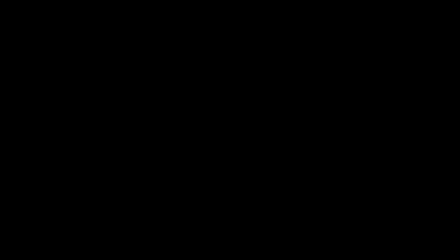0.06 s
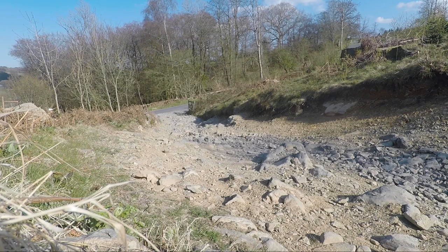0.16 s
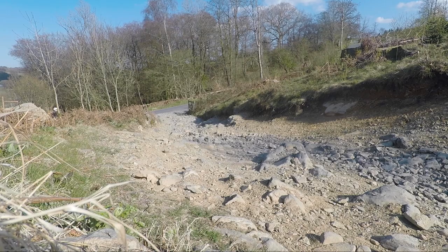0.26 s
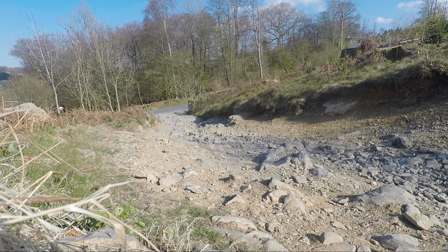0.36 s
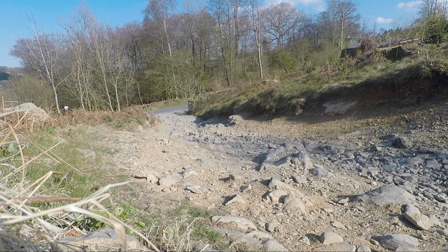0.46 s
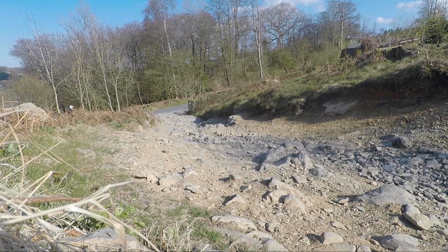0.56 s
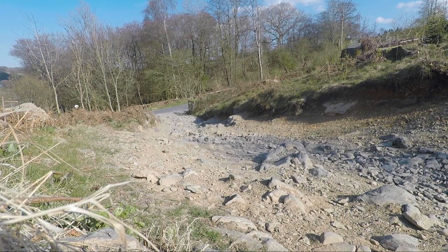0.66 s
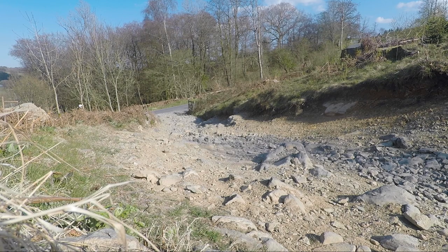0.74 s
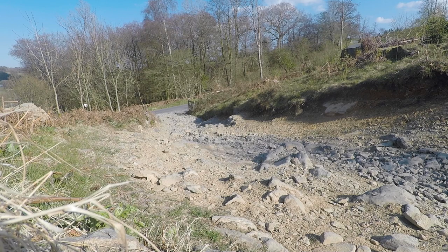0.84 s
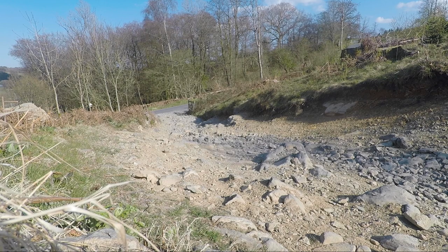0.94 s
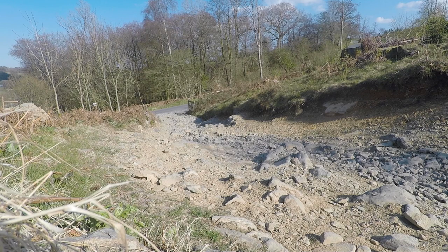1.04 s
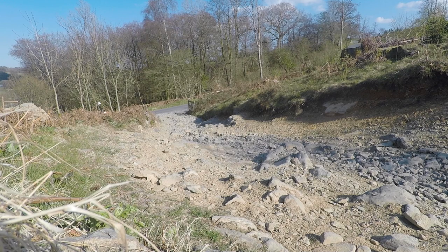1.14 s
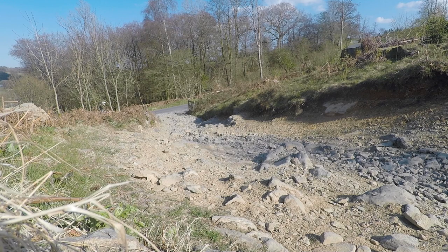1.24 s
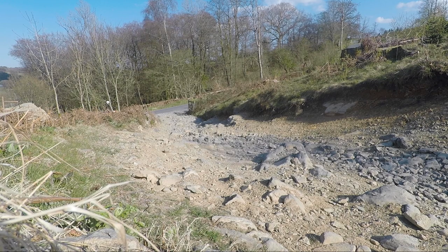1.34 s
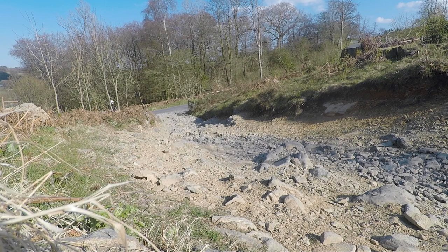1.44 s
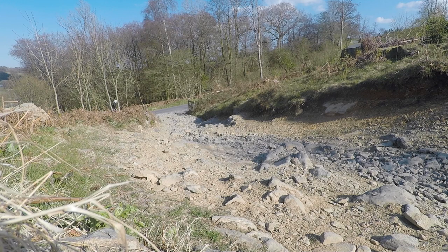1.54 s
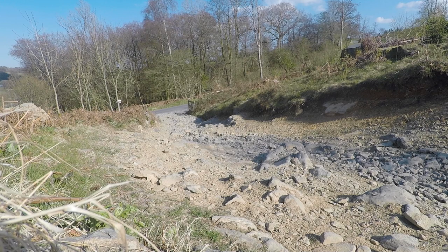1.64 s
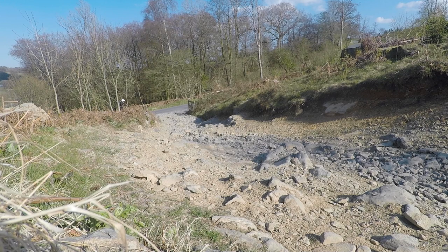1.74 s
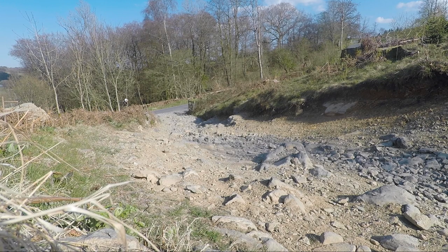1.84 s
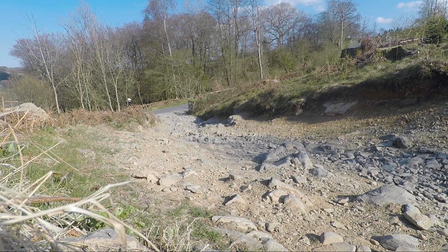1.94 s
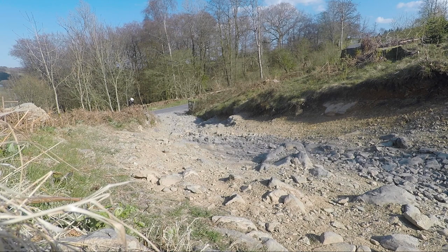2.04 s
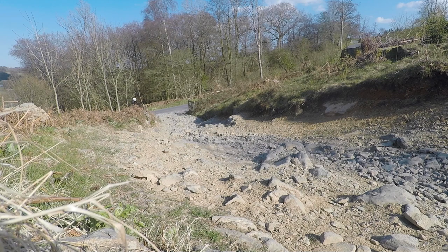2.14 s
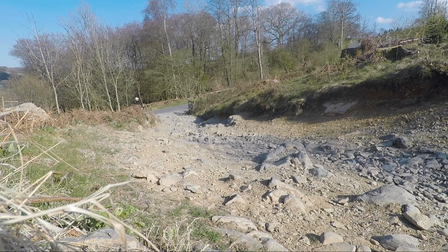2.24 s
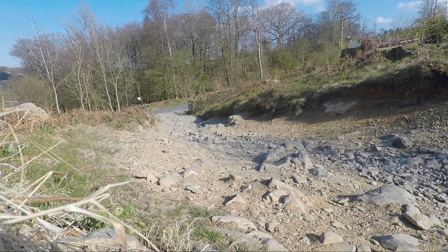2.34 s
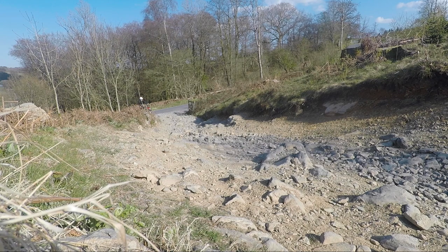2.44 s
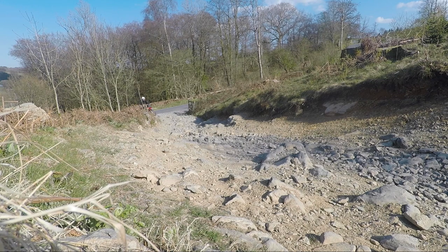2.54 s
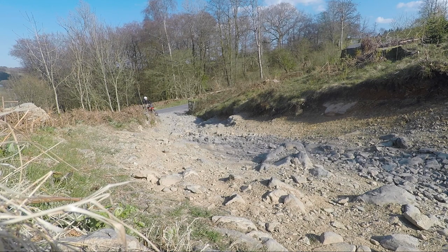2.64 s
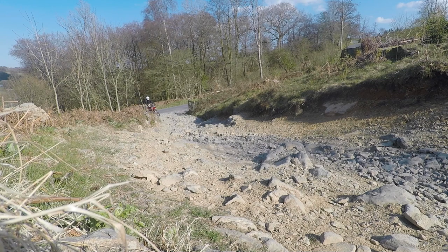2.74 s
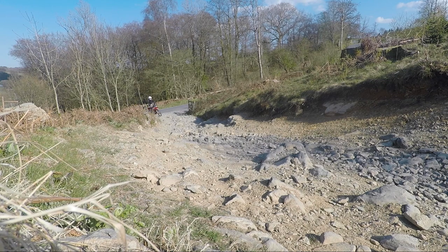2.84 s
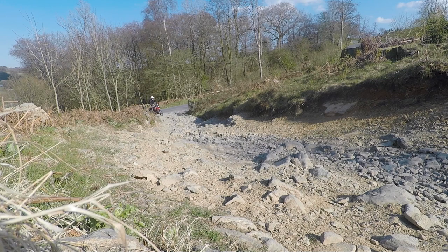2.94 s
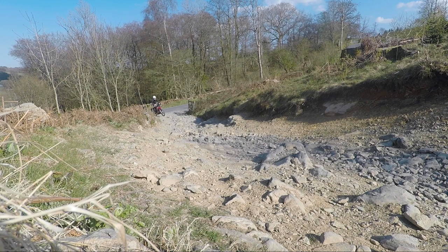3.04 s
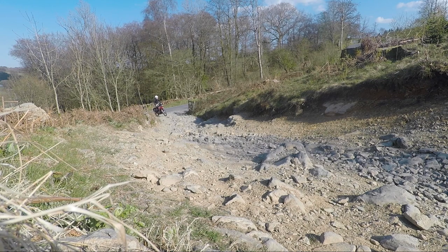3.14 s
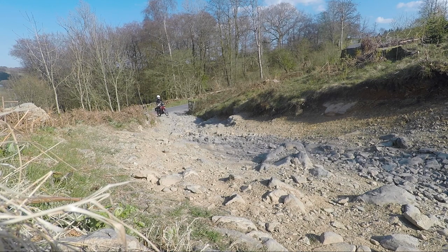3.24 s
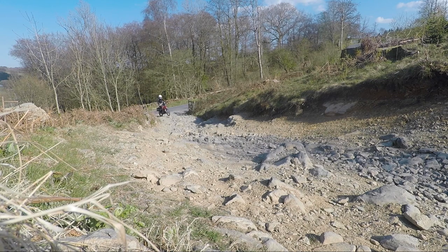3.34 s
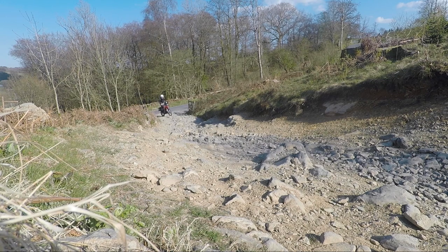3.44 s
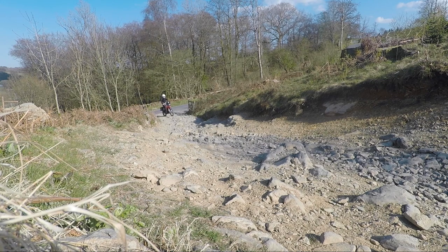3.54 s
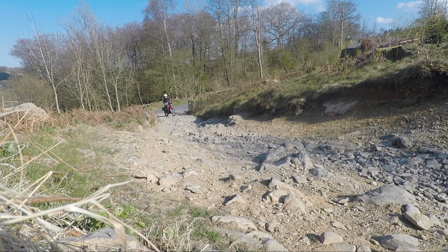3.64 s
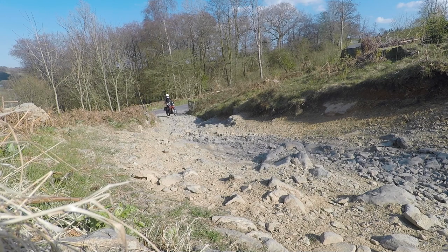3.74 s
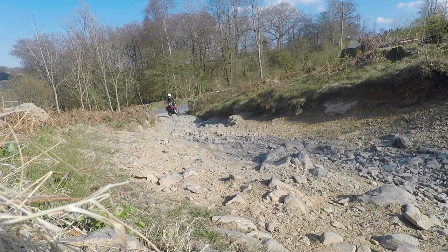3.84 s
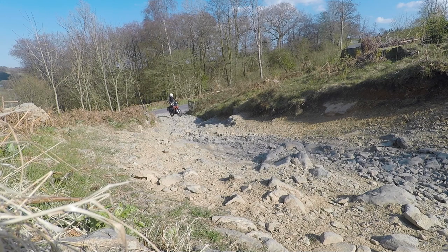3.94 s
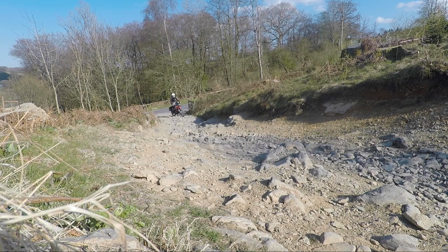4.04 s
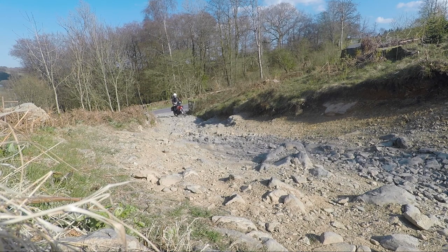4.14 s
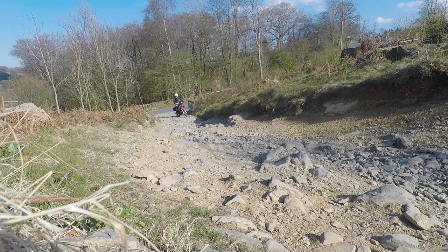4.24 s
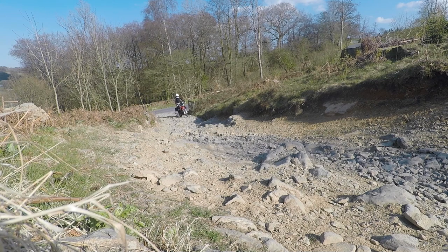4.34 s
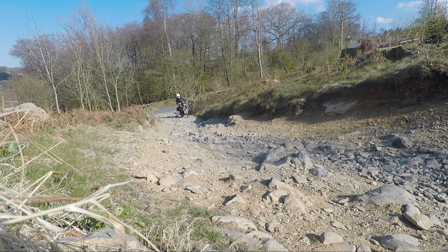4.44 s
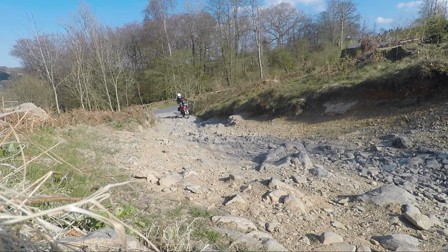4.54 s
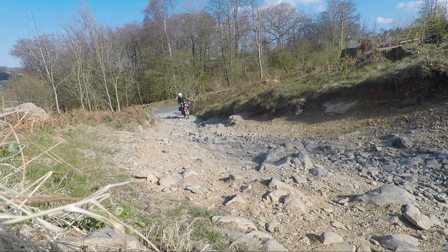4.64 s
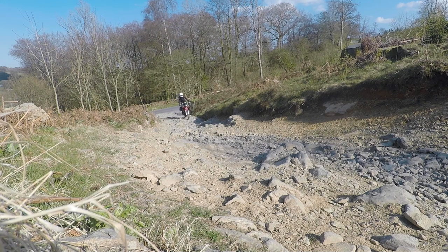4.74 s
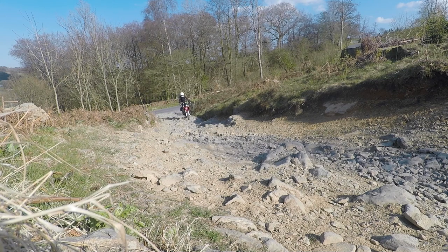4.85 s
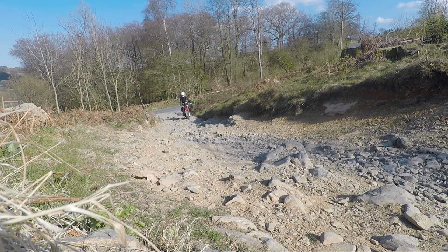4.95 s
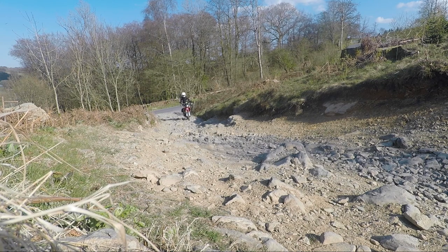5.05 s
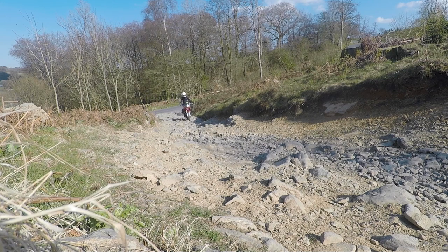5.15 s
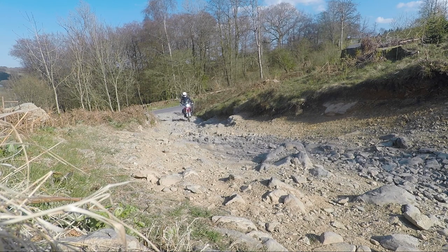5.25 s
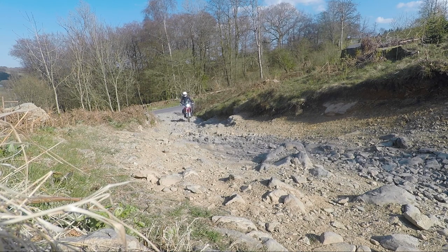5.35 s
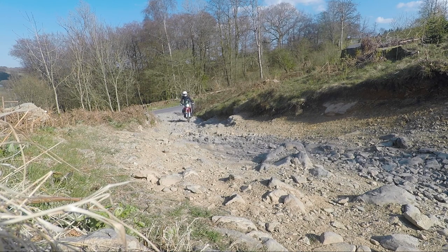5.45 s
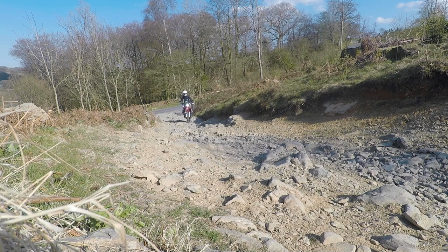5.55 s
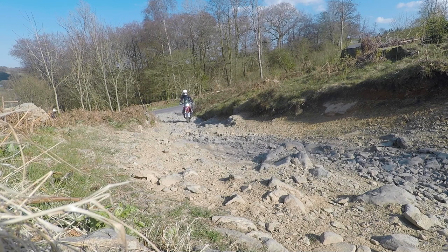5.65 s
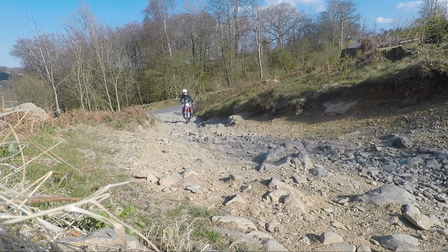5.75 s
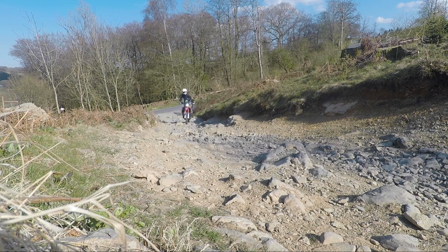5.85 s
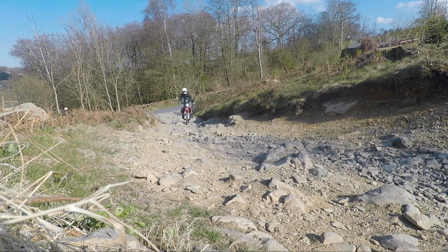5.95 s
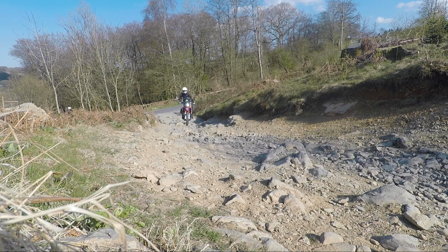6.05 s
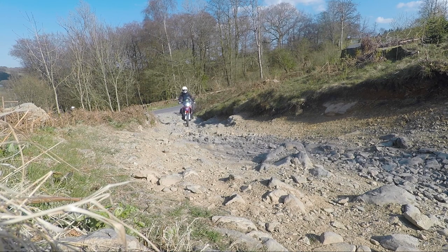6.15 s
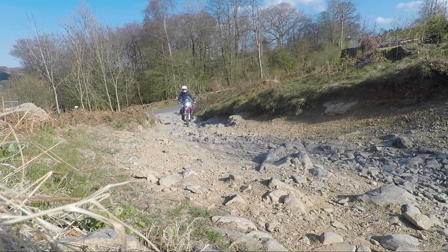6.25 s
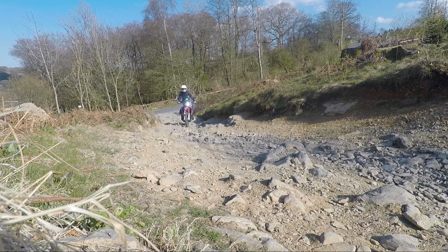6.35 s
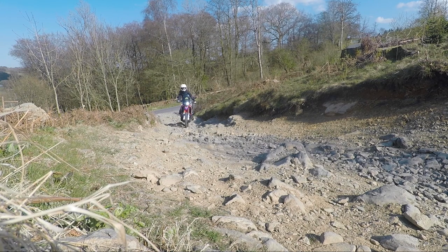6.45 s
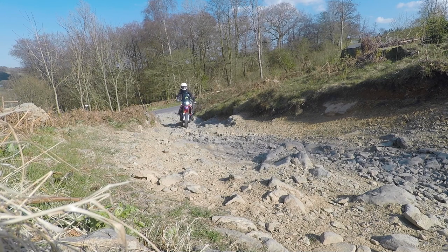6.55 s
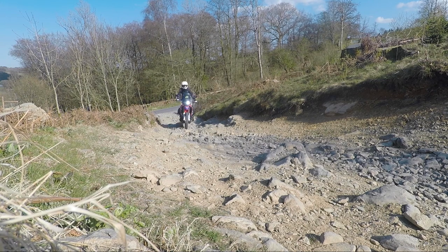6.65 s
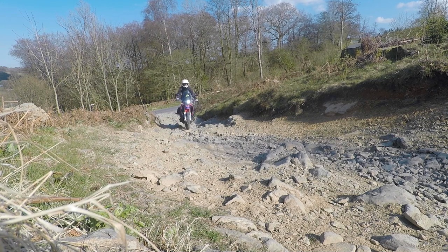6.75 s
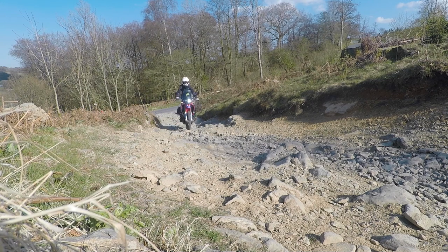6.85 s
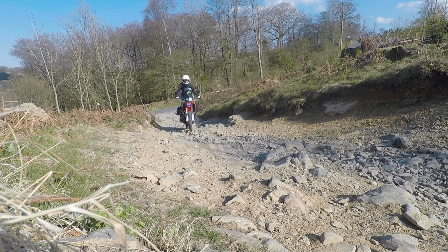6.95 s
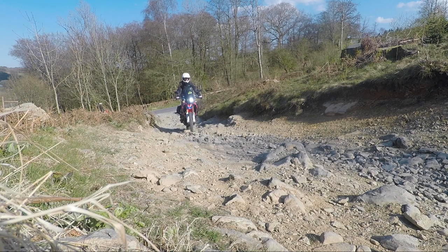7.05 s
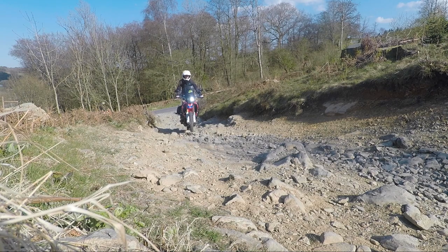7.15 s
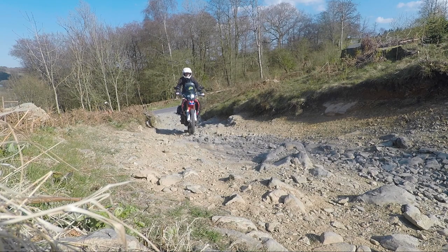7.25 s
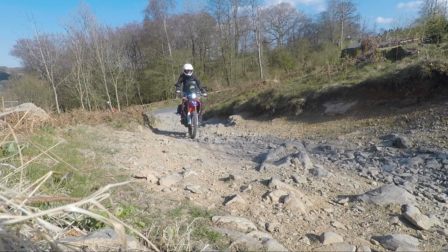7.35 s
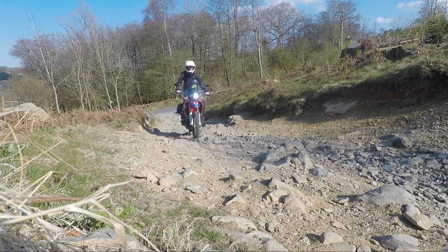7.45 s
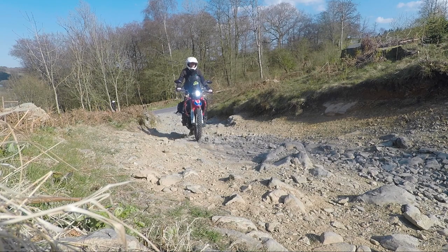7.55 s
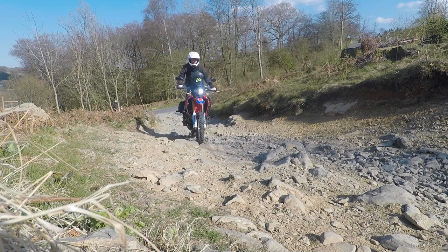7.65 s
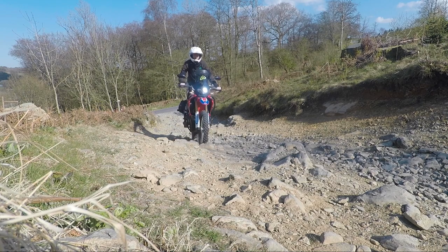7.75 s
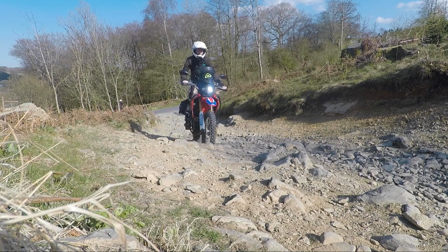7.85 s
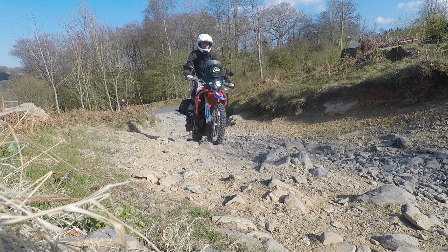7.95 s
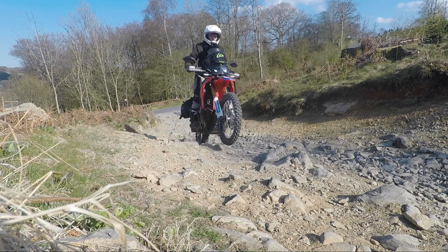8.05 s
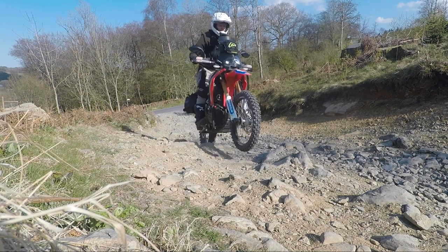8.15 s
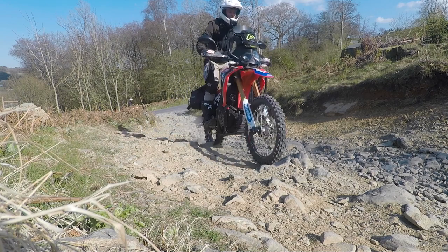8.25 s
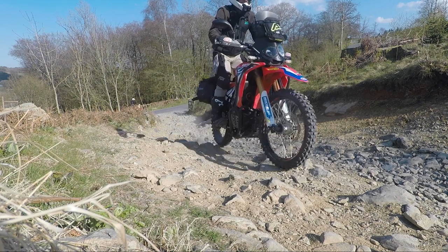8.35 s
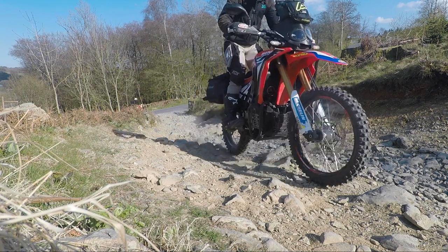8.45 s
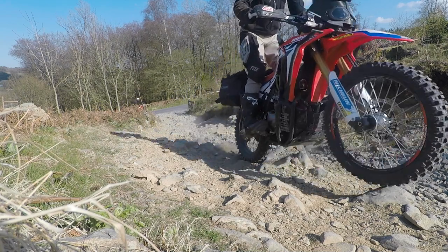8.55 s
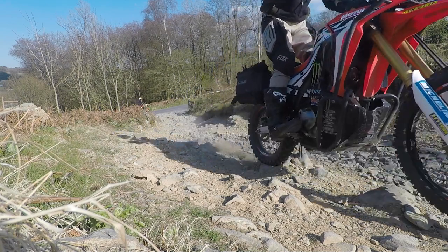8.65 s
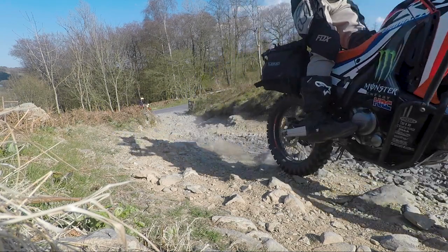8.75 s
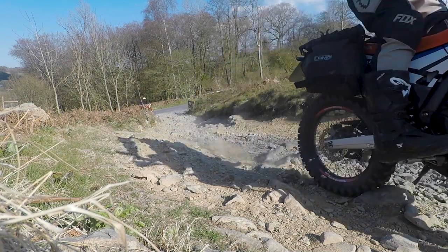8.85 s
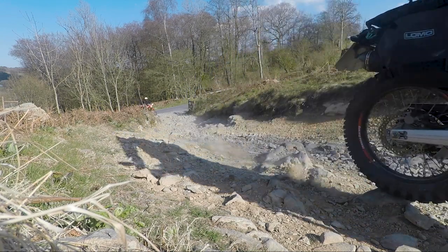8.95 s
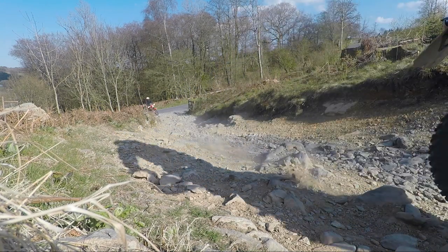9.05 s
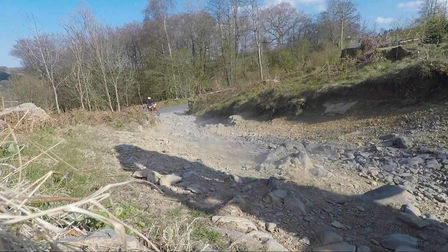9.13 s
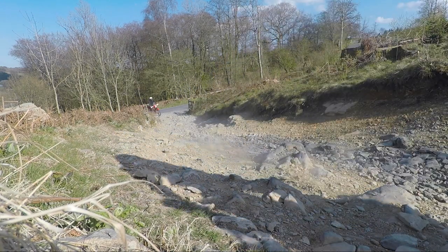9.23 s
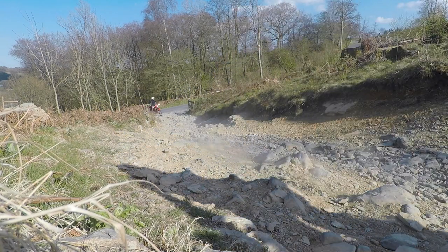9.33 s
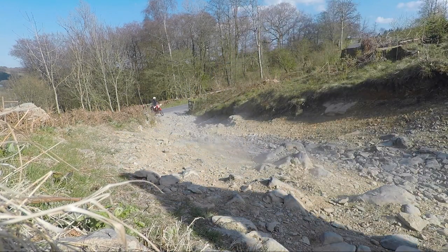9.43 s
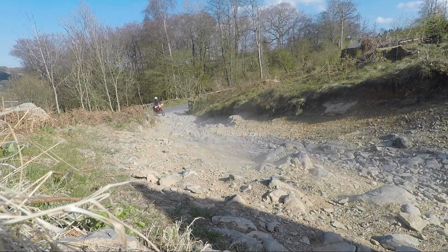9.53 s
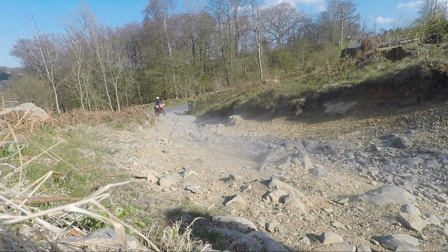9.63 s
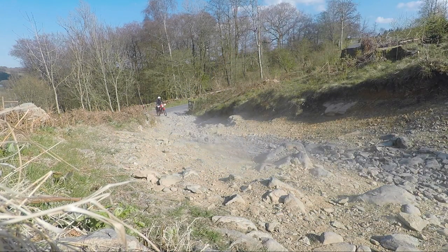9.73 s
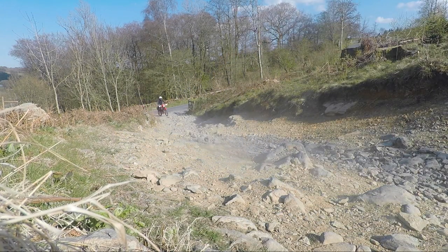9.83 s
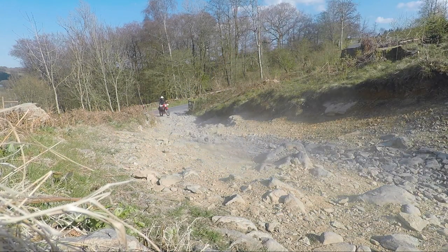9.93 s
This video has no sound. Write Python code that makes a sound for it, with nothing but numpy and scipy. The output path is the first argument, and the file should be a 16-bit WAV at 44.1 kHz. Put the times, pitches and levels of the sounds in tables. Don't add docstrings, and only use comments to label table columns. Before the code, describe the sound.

Silence for 0.2 s, then abrupt open-air hiss on a wooded hillside. Until about 3 s, faint chirps, buzzy notes and a quick trill of falling whistles sit over a dull distant trail bike, which revs up towards 4 s, then drops in pitch with a gear change and a heavier drone. From about 3 s a nearer single-cylinder bike fades in, firing roughly twenty times a second, with little stone ticks and one soft wind bump at 4 s. It grows steadily from 5 to 7 s, low thump and bark joined by valve rattle and scraping scree. From 7.3 s gravel crunches, stones crack and gear whine rises; engine speed lurches over rocks. It passes close on the right around 9 s, loudest, then the exhaust turns raspy and gassy from behind, easing by 10 s over the other engine's low drone.

```python
import sys
import numpy as np
from scipy import signal
from scipy.fft import rfft, irfft, next_fast_len
from scipy.io import wavfile
from scipy.ndimage import uniform_filter1d

SR = 44100
rng = np.random.default_rng(int(sys.argv[2]) if len(sys.argv) > 2 else 0)


def wrap_up_sound(samples):
    columns = np.atleast_2d(samples).T
    tamed = np.clip(columns, -1, 1)
    steps = np.round(tamed * 32767).astype(np.int16)
    wavfile.write(sys.argv[1], SR, steps)


def field_ratio(decibels):
    return 10 ** (np.asarray(decibels, dtype=float) / 20)


N = 440559
TIME = np.arange(N) / SR

# freq_hz, density_db
HILL_HISS = [(190, 6), (330, 2.5), (768, -6), (2470, -14.5), (2910, -14.5), (3650, -15), (4730, -19),
             (7460, -20), (10500, -25), (15000, -37), (16000, -72)]
# freq_hz, density_db
WIND_RUMBLE = [(14, -6), (30, -4), (55, -17)]
# centre_s, level_db, length_s
GUSTS = [
    (.77, -87, .06),
    (3.978, -30, .07),
]

# time_s, firing_rate_hz
FAR_RATE = [(0.2, 34.46), (0.72, 26.04), (0.9, 25.0), (1.68, 28.05), (1.98, 30.21), (2.16, 29.96),
            (2.79, 32.88), (3.6, 38.55), (4.14, 40.91), (4.32, 39.52), (4.59, 32.77), (4.8, 24.37),
            (5.0, 23.21), (6.0, 24.5), (7.4, 27), (8.6, 24), (10, 26.5)]
# time_s, level_db, load_0_1
FAR_LEVEL = [(.2, -35, 0.16), (.8, -32.5, 0.27), (1.55, -35.5, 0.59), (2.2, -32.5, 0.23), (2.6, -31.5, 0),
             (3.0, -30, 0), (3.4, -30.5, 0.34), (3.8, -29, 0.3), (4.32, -31, 0.73), (4.45, -27.5, 1),
             (4.75, -27.5, 1.07), (4.9, -28, 0.98), (5.5, -25.5, 0.46), (6.5, -22.5, 0.93),
             (7.5, -19.5, 0.61), (8.5, -19.5, 0.58), (9.0, -19, 0.64), (10, -18.5, 0.52)]
# freq_hz, level_db, t60_s
FAR_BOOM = [(106.3, 9, 0.071)]
# freq_hz, level_db, t60_s
FAR_DRONE = [(152, 3, 0.042), (187.2, 0.5, 0.048), (223.8, 2, 0.04), (277, -3, 0.039)]
# time_s, delay_s, gain
FAR_MIRROR = [(.2, 0.0066, 0.38), (.55, 0.0044, 0.66), (.7, 0.0047, 0.64), (1.2, 0.0045, 0.33),
              (1.7, 0.0061, 0.21), (2.6, 0.007, 0.2), (3.0, 0.0043, .3), (4.5, 0.0041, 0.22)]

# start_s, length_s, start_hz, end_hz, level_db
WHISTLES = [(.51, .015, 6200, 5300, -73), (.535, .025, 5400, 6400, -71), (.335, .02, 4250, 4550, -74),
            (0.35, .02, 4500, 3800, -71), (.615, .02, 4600, 4200, -71), (.635, .03, 4300, 4700, -70),
            (0.887, 0.037, 3700, 4470, -71), (1.08, .02, 3300, 4400, -66), (1.175, .02, 3600, 4330, -67),
            (1.25, .04, 3500, 4300, -69), (0.814, 0.1, 3450, 3460, -72), (1.45, .03, 4100, 5100, -68),
            (1.5, 0.041, 3200, 4330, -64), (1.605, .04, 3650, 3250, -71), (1.645, .045, 3250, 3750, -70),
            (1.83, .06, 4000, 3950, -67), (1.84, .045, 3100, 3800, -69), (1.98, .04, 3600, 4300, -66),
            (3.153, 0.045, 6800, 5900, -63), (3.137, .035, 4300, 4220, -68), (3.198, .03, 3920, 3300, -64),
            (2.79, 0.037, 3650, 3560, -71)]
# start_s, length_s, start_hz, end_hz, level_db
BUZZES = [(1.06, 0.054, 5600, 4900, -69), (1.35, .05, 5200, 5600, -66), (1.4, .05, 5600, 5000, -69),
          (1.555, .02, 5340, 5000, -63), (1.7, 0.04, 5300, 5500, -66), (1.74, .045, 5700, 5300, -71),
          (2.09, .055, 3610, 4100, -61), (2.21, 0.056, 3500, 4150, -62)]

# time_s, firing_rate_hz
NEAR_RATE = [(2.2, 15.92), (3.02, 17.09), (3.23, 20.34), (3.98, 18.87), (5.18, 23.29), (5.96, 24.0),
             (6.56, 25.13), (7.31, 23.92), (7.67, 23.83), (8.03, 27.95), (8.36, 16.44), (8.54, 25.33),
             (8.81, 18.36), (9.05, 20.45), (9.35, 21.86), (9.99, 19.71)]
# centre_s, firing_rate_change_hz
JOLTS = [(3.38, 1.9), (3.5, 1.6), (4.04, 1.8), (4.19, 2.0), (4.43, -1.8), (4.97, 1.9), (5.66, 2.4),
         (6.14, 1.9), (6.59, 0.9), (6.95, 2.2), (7.37, 1.5), (7.46, 3.3), (7.94, -3.6), (8.69, -1.7),
         (8.84, 3.5), (9.14, 5.6), (9.44, 0.7), (9.86, 5.8)]
# time_s, scatter_factor
ROUGH = [(0, 2.2), (4.4, 2.0), (4.8, 1.0), (6.8, 1.1), (7.3, 1.9), (8.9, 2.0), (9.2, .7), (10, .7)]
# time_s, level_db
NEAR_LEVEL = [(2.2, -45), (2.8, -40), (3.4, -33.5), (4.3, -29.5), (4.9, -26.5), (5.8, -21.5), (6.7, -20.5),
              (7.25, -20.5), (7.45, -17), (7.65, -19), (8.1, -16), (8.5, -13), (8.9, -12.5), (9.1, -12),
              (9.5, -17.5), (10, -19)]
# time_s, noise_tied_to_firing_0_1, pitch_factor
PASS = [(2.2, 0.43, 0.97), (6, 0.17, 1.046), (7.5, 0.09, 1.002), (8.4, 0.23, 1.055), (8.9, 0.36, 0.947),
        (9.2, 0, 0.96), (10, 0.7, 0.93)]
# cleared_s, loss_db, clearing_s
CORNERS = [
    (3.1, -6, 0.21),
    (4.651, -2.5, 0.065),
]
# freq_hz, level_db, t60_s
THUMP = [(53, -6.5, 0.24), (123.7, -0.5, 0.11), (151, -14, 0.07), (257.3, -2, 0.081)]
# freq_hz, level_db, t60_s
BARK = [(280, -31, 0.058), (391.8, 3.5, 0.07), (451, -4.5, 0.13), (505.7, 4, 0.058), (542.5, 8, 0.018),
        (626, -2, 0.1), (740, -1, 0.068)]
# freq_hz, level_db, t60_s
SUCK = [(190, 0, .03)]
# freq_hz, level_db, t60_s
PING = [(1610, 5.5, 0.023), (2550, -4, 0.017)]
# freq_hz, level_db, t60_s
KNOCK = [(1030, 13, 0.0093), (2150, 4, 0.01)]
# time_s, delay_s, gain
MIRROR = [(3, 0.00081, 0.59), (4.2, 0.0009, 0.38), (4.5, 0.00067, 0.84), (5.2, 0.00046, 0.82),
          (6.1, 0.00037, 0.81), (7, 0.00018, 0.39), (8, 0.0005, 0.06), (8.4, 0.00078, 0.35),
          (8.8, 0.0015, 0.084), (9.1, 0.0016, 0.63), (9.35, 0.0017, 0.033), (10, 0.0024, 0.21)]
# freq_hz, density_db
RATTLE = [(800, -13), (1080, -24), (1300, -14), (1660, -7), (2100, -12), (2490, 0), (2900, -11), (3300, -3),
          (3650, 1), (4000, -4), (4550, -8), (6500, -20)]
# freq_hz, density_db
HISS = [(2650, -23), (4500, -11.5), (5370, -12), (6270, -6.5), (7520, -5), (8200, -11), (9110, -12),
        (12500, -34.5), (14100, -23), (15000, -55)]
# freq_hz, level_db, pitch_wander_share
WHINE = [(3600, -11, .02), (2500, -14, .012)]
# freq_hz, density_db
ROAR = [(410, 0.5), (700, -1.5), (884, -10), (986, -1.5), (1330, -11.5), (1700, -5), (3000, -14),
        (3430, -11.5), (3820, -22), (4500, -16.5), (5850, -17.5), (9900, -55)]
# freq_hz, density_db
GAS = [(2350, -25), (4000, -17), (6220, -4), (7750, 8.5), (10200, -8.5), (13100, -17), (15600, -40),
       (16000, -36)]
# delay_s, width_s, gain
PUFFS = [(.0036, 0.0017, 0.4), (.0095, 0.00038, 0.16), (.012, 0.004, 0.2), (.018, 0.014, 0.038)]
# freq_hz, density_db
BUFFET = [(52, -16), (65, 7), (90, -8)]
# time_s, share
AIR = [(5.5, 0.17), (7, .4), (8.2, 0.25), (8.5, 0.77), (9.1, 0.79), (9.4, 0.31)]
# time_s, share_lost_0_1
TOP_LOSS = [(9.15, 0.41), (9.35, 0.27), (9.45, 0.6), (9.55, 0.74), (9.59, 0.55), (9.68, 0.18), (9.73, 1),
            (9.8, 1), (9.82, 0.1), (9.88, 0.97), (9.9, 0.88), (10, 0.8)]
# time_s, lag_s
LAG = [(0, 0), (8.5, 0), (8.9, .00005), (9.2, .00025), (10, .0003)]
# time_s, delay_s, gain
GROUND = [(7.7, .0007, 0), (8.1, .00075, .3), (8.6, .001, .35), (9.0, .0015, .3), (9.3, .0018, 0)]

# freq_hz, density_db
CRUNCH = [(350, -23), (600, -3), (1000, 2), (1500, -1), (2200, -1), (3200, -9), (5000, -30), (7000, -17)]
# time_s, level_db
CRUNCH_LEVEL = [(3, -55), (6.5, -43.5), (7.3, -37.5), (7.5, -34.5), (8, -31.5), (8.5, -25.5), (8.9, -24),
                (9.1, -21.5), (9.3, -32), (10, -93)]
# start_s, peak_db, ring_hz, left_minus_right_db
STONES = [(2.9944, -40.5, 3420, 1), (3.2653, -38, 3700, -1), (3.45, -35, 3800, 2), (3.6315, -38, 3820, 1),
          (3.6854, -37, 3570, 0), (3.944, -42, 2590, 5), (6.79, -26, 3900, 3), (6.9217, -19, 3600, 3.5),
          (7.106, -51, 3550, -51), (7.825, -21, 4260, 11), (7.9058, -23, 2430, 4), (8.334, -36, 1880, 33),
          (8.398, -20, 2520, 8), (8.496, -17.5, 2580, -6), (8.8195, -19, 3150, 4), (9.0153, -17.5, 2550, 3),
          (9.061, -16, 2320, -1)]
# start_s, length_s, level_db
SLIDES = [(4.299, 0.026, -46), (4.585, 0.032, -37), (4.839, 0.018, -40), (5.072, 0.042, -37),
          (5.504, 0.022, -34), (5.997, 0.032, -37), (6.228, 0.026, -33), (7.313, 0.029, -32),
          (7.379, 0.039, -28.5), (7.677, 0.042, -29), (8.021, .015, -24), (8.051, 0.024, -22),
          (8.22, 0.037, -27.5), (8.274, 0.015, -34), (8.338, 0.008, -21), (8.388, 0.053, -24),
          (8.444, 0.016, -39), (8.772, 0.024, -23), (8.821, 0.041, -20), (8.853, 0.049, -22)]
# freq_hz, density_db
RASP = [(500, 19), (1100, -3), (2500, -1.5), (4500, -2.5), (6500, -4.5), (12000, -31.0)]
# start_s, level_db, centre_hz
GRIT = [(6.72, -41, 9500), (6.807, -38, 8400), (7.119, -30, 9100), (7.152, -32, 7940), (7.384, -28, 6850),
        (7.543, -27, 5800), (8.559, -18, 7400)]


def curves(table, at=TIME):
    s, *rest = np.transpose(table)
    return [np.interp(at, s, c) for c in rest]


def ramp(start_s, length_s):
    return np.clip((TIME - start_s) / length_s, 0, 1)


def noise(points, alike=1.):
    hz, db = np.transpose(points)
    size = next_fast_len(N)
    bins_hz = np.arange(1, size // 2 + 2) * SR / size
    shape = field_ratio(np.interp(np.log(bins_hz), np.log(hz), db, -90, -90))
    mid, side = irfft(rfft(rng.standard_normal((2, size))) * shape, size)[:, :N]
    alike = np.clip(alike, 0, 1)
    both = np.sqrt(1 + alike) * mid + np.sqrt(1 - alike) * side * np.array([[1], [-1]])
    return both / np.sqrt(2) / mid.std()


def walk(rate_hz):
    k = int(SR / rate_hz)
    held = np.repeat(rng.standard_normal(N // k + 1), k)
    return 1.58 * uniform_filter1d(uniform_filter1d(held, k), k)[:N]


def pan(x, left_minus_right_db):
    half_db = np.broadcast_to(left_minus_right_db, x.shape[-1:]) / 2
    return x * field_ratio([half_db, -half_db])


def add(out, start_s, x):
    i = int(start_s * SR)
    out[..., i:i + x.shape[-1]] += x[..., :N - i]


def band(x, low_hz, high_hz):
    return signal.sosfilt(signal.butter(3, [low_hz, high_hz], "bandpass", fs=SR, output="sos"), x)


def steady(x):
    return x / np.sqrt(uniform_filter1d(x ** 2, size=SR // 2) + 1e-9)


def later(x, delay_s):
    return np.interp(TIME - delay_s, TIME, x)


def hillside():
    wind = field_ratio(-55.0) + sum(field_ratio(db) * np.exp(-((TIME - s) / length) ** 2) for s, db, length in GUSTS)
    hiss = noise(HILL_HISS, 0.0067) * field_ratio(-47 + .4 * walk(3.6))
    return pan(hiss + noise(WIND_RUMBLE, .95) * wind, 1.0)


def firings(rate_hz, start_s, phase):
    turns = phase + np.cumsum(rate_hz * (TIME > start_s)) / SR
    return turns, TIME[1:][np.diff(np.floor(turns)) > 0]


def exhaust(times, modes, pitch, rise_s, turn, scatter_db, wobble):
    hz, db, t60 = np.transpose(modes)[:, :, None]
    out, t = np.zeros(N), np.arange(3000) / SR
    rise = 1 - np.exp(-(t / rise_s) ** 2)
    decay = np.exp(-np.log(1000) * t / t60)
    for s, p, rough in zip(times, pitch, curves(ROUGH, times)[0]):
        size, tuning, balance = rough * rng.standard_normal((3, len(modes), 1))
        ring = np.sin(2 * np.pi * hz * p * (1 + wobble * tuning) * t + turn) * decay
        add(out, s, (field_ratio(db + scatter_db * (size[0] + balance)) * ring).sum(0) * rise)
    return out


def far_bike():
    rate_hz, (level_db, load) = curves(FAR_RATE)[0], curves(FAR_LEVEL)
    turns, times = firings(rate_hz, FAR_RATE[0][0], phase=.83)
    even = np.ones(len(times))

    hum_db = level_db - 22.5 + 18.5 * load + 1.5 * np.maximum(rate_hz - 34, 0)
    hum = np.sqrt(2) * np.sin(4 * np.pi * turns) * field_ratio(0.42 * walk(3.8))

    boom_db = level_db - 20.5 + 24.5 * load
    boom = exhaust(times - .006, FAR_BOOM, even, rise_s=.004, turn=.1, scatter_db=.6, wobble=.015)
    boom = band(boom, 75, 150)

    drone_db = level_db - 5 * ramp(4.8, 1)
    drone = exhaust(times - .008, FAR_DRONE, even, rise_s=.004, turn=.1, scatter_db=.6, wobble=.01)
    drone = band(drone, 138, 285)
    delay_s, gain = curves(FAR_MIRROR)
    drone = band(drone + gain * later(drone, delay_s), 104, 328)

    direct = hum * field_ratio(hum_db) + steady(boom) * field_ratio(boom_db) + steady(drone) * field_ratio(drone_db)
    tail = rng.standard_normal((2, 9000)) * np.exp(-np.arange(9000) / SR / 0.19)
    tail = tail[:1] + 0.1 * tail[1:] * [[1], [-1]]
    echoes = signal.fftconvolve(direct[None], tail, axes=1)[:, :N]
    hidden = np.minimum(ramp(4.8, .5), .85)
    echo_db = -45 + 14 * hidden - 4 * ramp(9.0, .4)
    left, right = pan(direct * (1 - hidden) + echoes * field_ratio(echo_db), 3.7)
    return np.array([left, later(right, 0.0002)])


def birds():
    out, flutter = np.zeros((2, N)), walk(90)
    notes = [(2.152 + k * .1158, .056, 6000, 3000, -61.5 - 1.2 * abs(k - 2.3), 0) for k in range(8)]
    notes += [(*n, 0) for n in WHISTLES] + [(*n, 61.5) for n in BUZZES]
    for s, length_s, start_hz, end_hz, db, buzz_hz in notes:
        t = np.arange(int(length_s * SR)) / SR
        hz = start_hz + (end_hz - start_hz) * t / length_s + 250 * np.sin(2 * np.pi * buzz_hz * t)
        swell = np.sin(np.pi * t / length_s) ** 0.56
        level = field_ratio(db + 12 + 1.4 * flutter[int(s * SR):][:len(t)])
        add(out, s, pan(np.sin(2 * np.pi * np.cumsum(hz) / SR) * swell * level, 1.4))
    tail = rng.standard_normal((2, 4000)) * np.exp(-np.arange(4000) / SR / .03)
    return .75 * out + .015 * signal.fftconvolve(out, tail, axes=1)[:, :N]


def approach(rate_hz, behind):
    speed_m_s, passes_s, closest_m = 4.37, 9.197, 2.51
    along_m = speed_m_s * (passes_s - TIME)
    near = closest_m / np.hypot(along_m, closest_m)
    shade_db = sum(db / (1 + np.exp((TIME - s) / (clear_s / 2))) for s, db, clear_s in CORNERS)

    surge_db = .5 * (rate_hz - uniform_filter1d(rate_hz, size=SR // 2))
    thump_db = curves(NEAR_LEVEL)[0] + surge_db
    bark_db = thump_db - 0.5 + 0.7 * shade_db - 7.3 * near ** 1.4

    leaving_db, mouth_db = -0.5, 13
    effort_db = 1.17 * (thump_db - uniform_filter1d(thump_db, size=SR))
    distance_db = -20 * np.log10(closest_m / near)
    rattle_db = -19 + distance_db + shade_db + effort_db + leaving_db * behind ** 2
    gas_db = rattle_db - 2 + (mouth_db - leaving_db) * ramp(8.9, 0.51)

    side = (along_m - 0.6) / np.hypot(along_m - 0.6, closest_m)
    pan_mid_db = -7 + 11 * side
    pan_high_db = -0.5 + 18 * near * (1 - behind ** 3) - 1.4 * behind ** 3
    return thump_db, bark_db, rattle_db, gas_db, 3.5, pan_mid_db, pan_high_db


def pipe_blows(times, pitch, close, behind, thump_db, bark_db):
    echo_s = 0.00828
    thump = exhaust(times + 0.0016, THUMP, pitch, rise_s=0.0016, turn=0.11, scatter_db=1.1, wobble=.015)
    thump = band(thump, 48.0, 840)
    bark = exhaust(times, BARK, pitch, rise_s=0.001, turn=-0.12, scatter_db=1.1, wobble=.015)
    bark = band(bark, 160, 677)
    bark = close * bark + (1 - close) * band(bark, 57, 710) * field_ratio(-11.5)
    thump = thump + 0.7 * later(thump, echo_s)
    bark = bark + 0.23 * later(bark, echo_s)
    suck = exhaust(times + .0035, SUCK, pitch, rise_s=.001, turn=np.pi, scatter_db=.7, wobble=.015)

    low = steady(thump) * field_ratio(thump_db) + steady(bark) * field_ratio(bark_db)
    low = low + steady(suck) * field_ratio(thump_db - 13 + 9 * behind ** 2) * close
    delay_s, gain = curves(MIRROR)
    return (low + gain * later(low, delay_s)) / (1 + 0.66 * gain)


def pipe_metal(times, pitch, behind):
    echo_s = 0.00828
    ping = exhaust(times + .008, PING, pitch, rise_s=.0008, turn=.1, scatter_db=.7, wobble=.015)
    ping = ping + .4 * later(ping, echo_s)
    knock = exhaust(times + .0085, KNOCK, pitch, rise_s=.0003, turn=.1, scatter_db=1.5, wobble=.05)
    knock = band(knock + 0.42 * later(knock, echo_s), 610, 4030)
    in_view = np.maximum(behind, .5 * ramp(8.2, 0.28))
    return steady(ping) + 0.81 * in_view * steady(knock)


def valve_gear(turns, tied):
    loose = field_ratio(1.64 * walk(40))
    cyclic = (1 + np.cos(2 * np.pi * (turns - .1))) ** 1.42 * field_ratio(1.8 * walk(22))
    return steady((1 - tied) * loose + tied * cyclic)


def gears():
    loaded_db = 7 * np.exp(-((TIME - 8.15) / 0.064) ** 4)
    past = 1 / (1 + np.exp((8.7 - TIME) / .1))
    out = np.zeros(N)
    for k, (hz, db, wander) in enumerate(WHINE):
        tone_hz = hz * (1 - .2 * past) * (1 + wander * walk(90))
        level_db = db + 2.8 * walk(50) + k * loaded_db + 5 * ramp(7.6, 1)
        out += np.sin(2 * np.pi * np.cumsum(tone_hz) / SR) * field_ratio(level_db)
    return out


def gas_puffs(times):
    since_s = TIME - np.r_[-1, times][np.searchsorted(times - .004, TIME)]
    flow = sum(gain * np.exp(-((since_s - delay) / width) ** 2) for delay, width, gain in PUFFS)
    return uniform_filter1d(flow, size=80) * field_ratio(1.6 * walk(22))


def gravel():
    grains_per_s = 1800
    grains = (rng.random(N) < grains_per_s / SR) * field_ratio(np.minimum(4.0 * rng.exponential(size=N), 8))
    bursts = signal.lfilter([1], [1, -.985], grains)
    return noise(CRUNCH, 0.6) * steady(bursts) * field_ratio(curves(CRUNCH_LEVEL)[0] + .8 * walk(14))


def near_bike():
    coarse, jolt_s = TIME[::50], .07
    jolts_hz = sum(hz * np.exp(-((coarse - s) / jolt_s) ** 2) for s, hz in JOLTS)
    rate_hz = curves(NEAR_RATE)[0] + np.interp(TIME, coarse, jolts_hz)
    turns, times = firings(rate_hz, NEAR_RATE[0][0], phase=.97)
    behind = ramp(8.65, 0.62)
    close = np.maximum(ramp(3.4, 2.8), .02)
    thump_db, bark_db, rattle_db, gas_db, pan_low_db, pan_mid_db, pan_high_db = approach(rate_hz, behind)
    tied, pitch = np.clip(curves(PASS)[0], 0, 1), curves(PASS, times)[1]

    low = pipe_blows(times, pitch, close, behind, thump_db, bark_db)
    motor = valve_gear(turns, tied) * (1 - behind)
    puff = gas_puffs(times)

    middle = (noise(RATTLE, 0.98) + gears()) * motor + noise(ROAR, 0.3) * steady(puff + 0.07) * behind
    middle = middle + pipe_metal(times, pitch, behind) * field_ratio(-9.0 + 2.1 * behind) * np.sqrt(close)
    spin = steady(0.25 - .18 * behind + uniform_filter1d(puff, size=350))
    middle = middle * field_ratio(rattle_db) + gravel() * spin
    delay_s, gain = curves(GROUND)
    echo = np.array([later(m, delay_s) for m in middle])
    middle = (middle + gain * echo) / np.sqrt(1 + gain ** 2)

    high = noise(HISS, .7) * motor + noise(GAS, .9) * steady(puff + .001) * behind
    high = high + curves(AIR)[0] * band(high, 9700, 13400)
    gone = np.clip(curves(TOP_LOSS)[0], 0, 1)
    high = (1 - gone) * high + gone * band(band(high, 2700, 8920), 2100, 10270)

    buffet = noise(BUFFET, 0.063) * field_ratio(thump_db - 8.5 - 2 * behind + 1.8 * walk(6.5))
    body = pan(low, pan_low_db) + pan(middle, pan_mid_db)
    high = pan(high * field_ratio(gas_db), pan_high_db)
    lag_s = curves(LAG)[0]
    body[0], high[0] = later(body[0], lag_s), later(high[0], 0.23 * lag_s)
    return (body + high + buffet) * ramp(1.9, 1.2)


def stones():
    out, t = np.zeros((2, N)), np.arange(900) / SR
    rise = 1 - np.exp(-t / 0.0018)
    for s, db, hz, pan_db in STONES:
        crack = band(rng.standard_normal(len(t)), 2800, 6600) * np.exp(-t / 0.0097)
        ring = np.sin(2 * np.pi * hz * t) * np.exp(-t / 0.0037)
        add(out, s, pan((0.96 * crack + 1.07 * ring) * rise * field_ratio(db + 4.5), pan_db))
    return out


def scree():
    out, gate, t = np.zeros((2, N)), np.zeros(N), np.arange(400) / SR
    for s, length_s, db in SLIDES:
        add(gate, s, field_ratio(db) * signal.windows.tukey(int(length_s * SR), .6))
    shape = np.exp(-t / 0.002) * (1 - np.exp(-t / .001))
    for s, db, hz in GRIT:
        add(out, s, band(rng.standard_normal(len(t)), 0.5 * hz, 1.3 * hz) * shape * field_ratio(db + 10))
    return out + noise(RASP, 0.46) * gate * field_ratio(1.9 * walk(300))


def scene():
    quiet = hillside() * field_ratio(-16 * ramp(7.5, 1.08))
    return quiet + far_bike() + birds() + near_bike() + stones() + scree()


def roll_off(x):
    return signal.sosfilt(signal.butter(12, 16480, fs=SR, output="sos"), x)


def record(dry):
    wet = np.tanh(0.79 * dry) / 0.87 * ramp(0.207, 0.0015)
    wet = signal.sosfilt(signal.butter(6, 14800, fs=SR, output="sos"), wet)
    return roll_off(wet)


dry = scene()
out = record(dry)
wrap_up_sound(out)
```